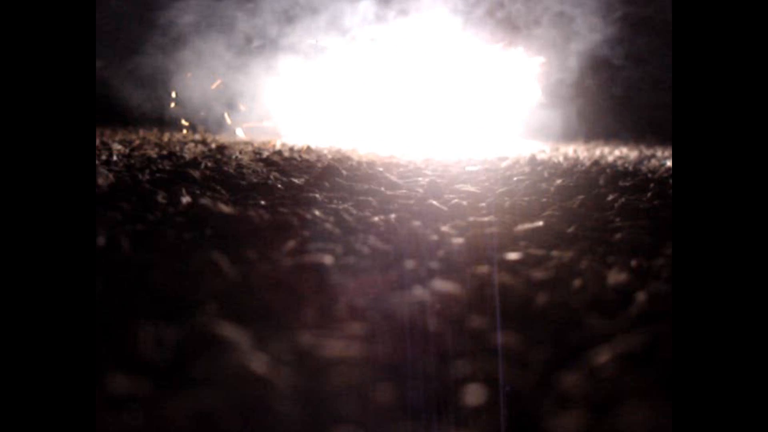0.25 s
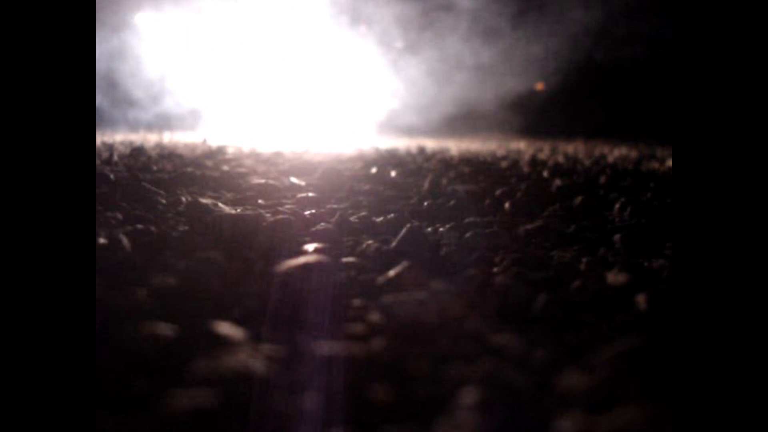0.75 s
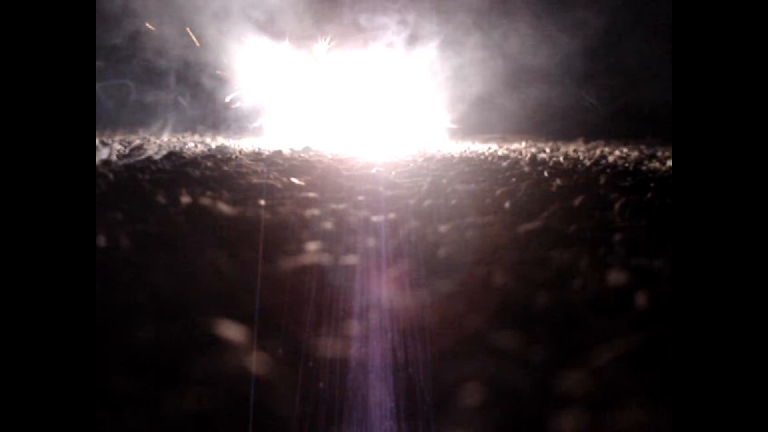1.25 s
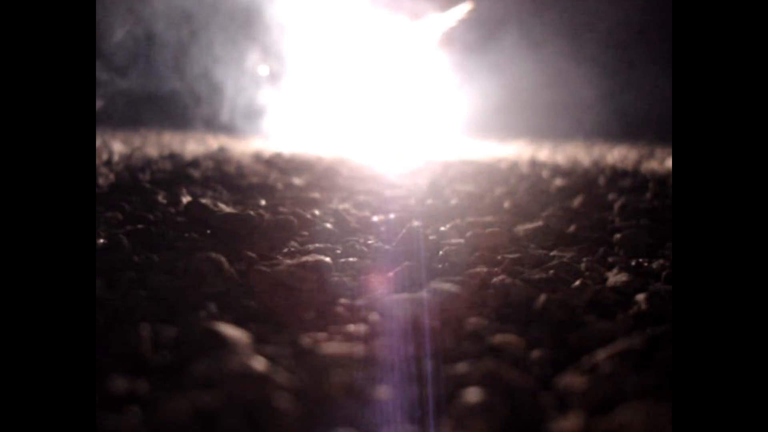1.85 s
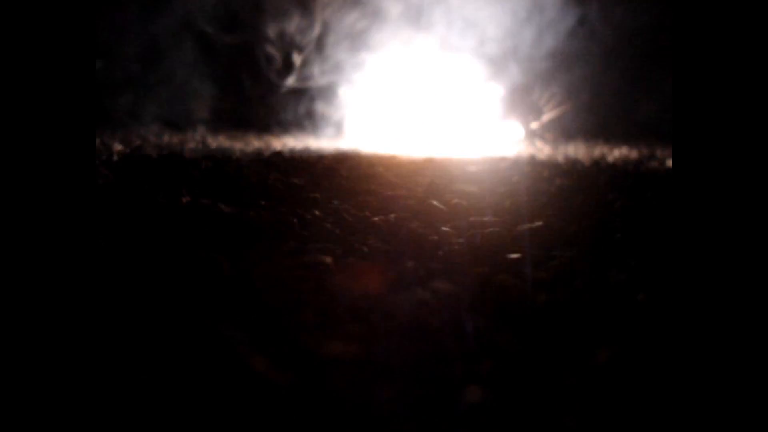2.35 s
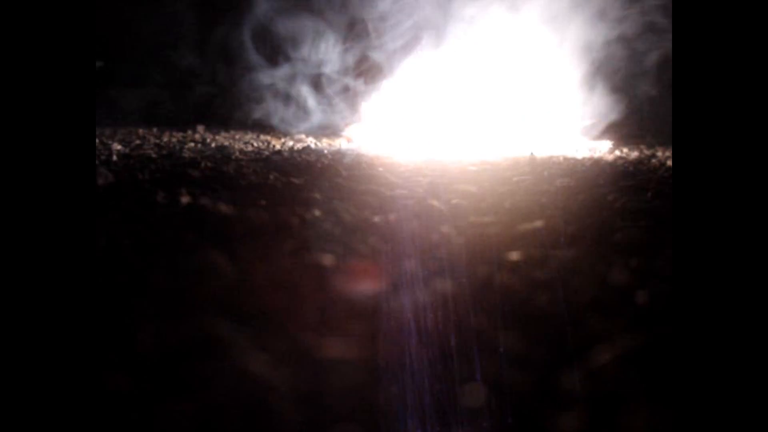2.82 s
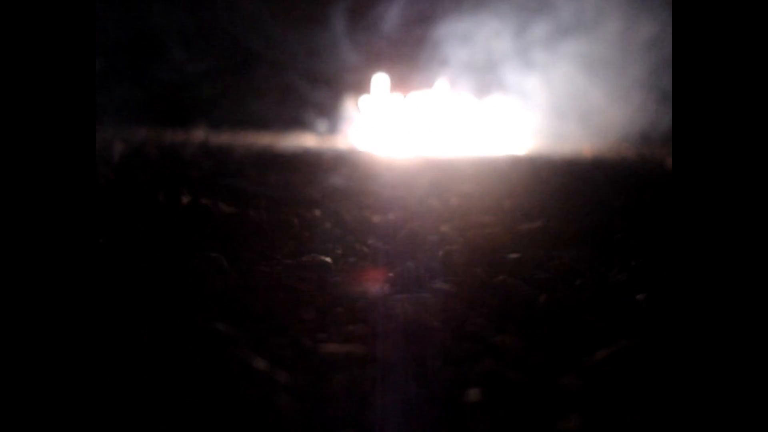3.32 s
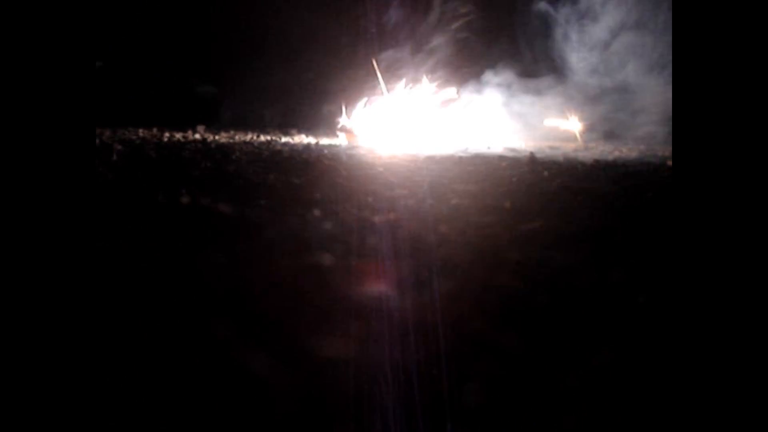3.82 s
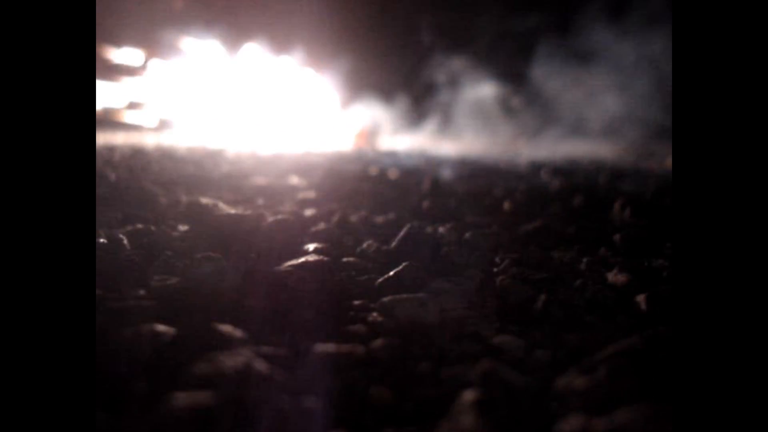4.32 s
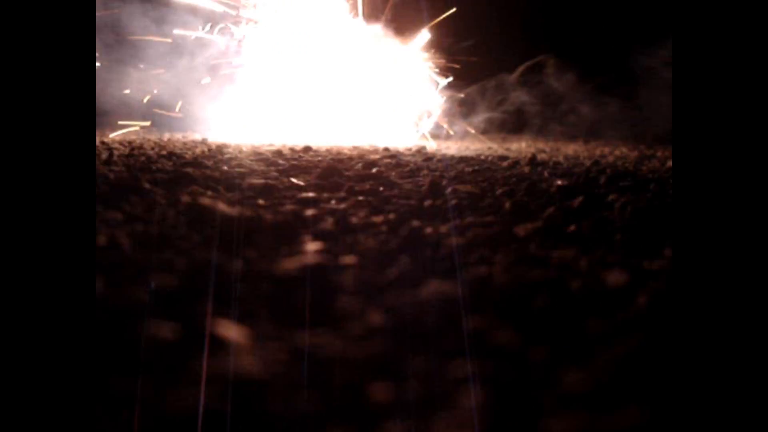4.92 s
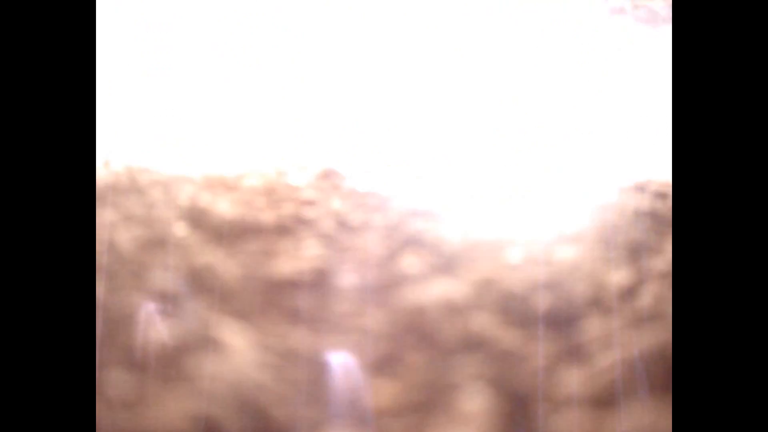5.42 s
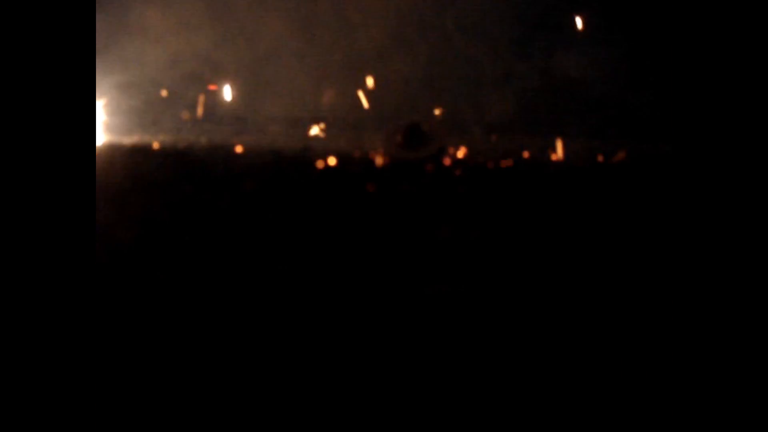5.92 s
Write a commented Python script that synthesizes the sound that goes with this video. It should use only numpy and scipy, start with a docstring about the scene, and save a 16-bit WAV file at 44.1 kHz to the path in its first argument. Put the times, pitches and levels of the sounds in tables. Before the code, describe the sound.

A small firework hisses and sputters close by, chokes, then spits out a quick volley of crackling pops and dies.

```python
"""A small firework burns on rough ground at night, close to the microphone. From the start its jet of gas and
sparks hisses and wanders over a faint hum, now and then with a soft low thump and a brief dip in the hiss. Near
1.8 s one pellet bursts. Near 4.8 s the jet chokes and sputters, then flares once and dies. A volley of
crackling pellets follows over a low rumble of stirred air, and a few last ticks fade at about 6 s."""
import sys
import numpy as np
from scipy import signal
from scipy.fft import rfft, irfft
from scipy.io import wavfile

SR = 44100
rng = np.random.default_rng(int(sys.argv[2]) if len(sys.argv) > 2 else 0)


def to_wav(s):
    """Save 16-bit WAV."""
    ch = np.atleast_2d(s).T  # columns
    pcm = np.round(np.clip(ch, -1, 1) * 32767)  # PCM
    wavfile.write(sys.argv[1], SR, pcm.astype(np.int16))


N = 271638
TIME = np.arange(N) / SR


def from_db(db):
    """Turn decibels into a number to multiply by."""
    return 10 ** (np.asarray(db) / 20)


def rms_one(x):
    """Scale a sound to an average strength (rms) of 1."""
    return x / np.sqrt(np.mean(x ** 2) + 1e-20)


def one_ms(x):
    """Scale a burst to the energy of 1 ms of sound at rms 1."""
    return x / np.sqrt(np.sum(x ** 2) * 1000 / SR + 1e-20)


def at_times(rows, t):
    """Read each column of a table at times t, gliding between rows."""
    seconds, *columns = np.transpose(rows)
    return [np.interp(t, seconds, column) for column in columns]


def at_hz(rows, hz):
    """Read a table of levels at frequencies hz, gliding evenly in pitch."""
    row_hz, db = np.transpose(rows)
    return np.interp(np.log(hz), np.log(row_hz), db)


def band(x, low_hz, high_hz, order=1):
    """Keep mainly the sound between two frequencies."""
    edges = np.clip([low_hz, high_hz], 10, .45 * SR)
    return signal.sosfilt(signal.butter(order, edges, "band", fs=SR, output="sos"), x)


def drift(rate):
    """A smooth random wobble of rms 1 that changes about rate times a second."""
    step = 40   # samples between points of the wobble
    memory = np.exp(-2 * np.pi * rate * step / SR)
    noise = rng.standard_normal(N // step + 2002)
    slow = signal.lfilter([1], [1, -2 * memory, memory ** 2], noise)[2000:]
    return np.interp(np.arange(N) / step, np.arange(len(slow)), rms_one(slow))


def add(out, start, sound):
    """Mix in a short sound, start seconds from the beginning."""
    i = int(np.clip(round(start * SR), 0, N - 1))
    out[i:i + len(sound)] += sound[:N - i]


# The tone of the night air. Each row: frequency in Hz, relative level in dB.
AIR_TONE = [(25, 6), (60, -7), (200, -1), (1000, -5), (5000, -10), (10000, -23.5)]


def night_air(level_db=-71):
    """The open air is a faint, steady noise, strongest in the bass."""
    hz = np.maximum(np.arange(N // 2 + 1) * SR / N, 1)
    spectrum = rfft(rng.standard_normal(N)) * from_db(at_hz(AIR_TONE, hz))
    return from_db(level_db) * rms_one(irfft(spectrum, N))


# How loud the hum is. Each row: time in seconds, level in dB.
HUM_LEVELS = [(0, -58), (2.4, -63.5), (4.6, -57.5), (5.9, -80)]


def hum(pitch_hz=124, spread_hz=9):
    """A narrow band of noise makes a faint hum that wavers under the hiss."""
    noise = band(rng.standard_normal(N), pitch_hz - spread_hz, pitch_hz + spread_hz, order=2)
    return from_db(at_times(HUM_LEVELS, TIME)[0]) * rms_one(noise)


# How loud the stirred air is. Each row: time in seconds, level in dB.
RUMBLE_LEVELS = [(0, -75), (3.9, -71), (4.3, -62), (5.25, -64), (5.48, -53), (5.78, -62), (6.0, -81)]


def air_rumble():
    """Stirred air rumbles on the microphone, most of all during the volley."""
    noise = band(rng.standard_normal(N), low_hz=42, high_hz=72, order=2)
    return from_db(at_times(RUMBLE_LEVELS, TIME)[0]) * rms_one(noise)


# Soft low thumps, most with a brief dip in the hiss. Each row: start in seconds, peak of the thump in dB before
# filtering, # dip of the hiss in dB (below zero, the hiss rises instead).
LOW_THUMPS = [(0.252, -42, -2), (0.267, -43, 0.5), (1.081, -51, -0.5), (1.487, -42, -2), (1.594, -37, 6.5),
              (1.769, -39, 1.5), (2.009, -43, 3.5), (2.127, -46, 3), (3.562, -47, 1), (4.936, -36, 21.5)]


def low_thumps(rise_s=0.0024, fall_s=0.016, recover_s=0.034):
    """Soft low thumps sound, and the hiss dips briefly with each. Returns the thumps and a volume curve for the
    hiss."""
    t = np.arange(SR // 4) / SR
    onset = 1 - np.exp(-t / rise_s)
    push = onset * np.exp(-t / fall_s)
    sag = onset * np.exp(-t / recover_s)
    thumps, dip_db = np.zeros(N), np.zeros(N)
    for start, push_db, depth_db in LOW_THUMPS:
        add(thumps, start, -from_db(push_db) * push / push.max())
        add(dip_db, start, depth_db * sag / sag.max())
    return band(thumps + 1e-18, low_hz=16, high_hz=400), from_db(-dip_db)


def sparks(per_s, spread_db):
    """Sparks snap at random moments, most faint and a few strong."""
    sizes = from_db(spread_db * np.minimum(rng.exponential(1, N), 4))
    snaps = rms_one(sizes * rng.choice([-1, 1], N))
    chance = per_s / SR
    return snaps * (rng.random(N) < chance) / np.sqrt(chance)


# Spells of sputtering. Each row: start in seconds, end in seconds, starting level in dB.
SPUTTER_SPELLS = [(4.76, 5.3, -45), (5.77, 6.15, -64.5)]


def sputter(fade_db_per_s=12):
    """When the jet chokes, and again after the volley, single sparks stand out and fade."""
    level = np.zeros(N)
    for start, end, db in SPUTTER_SPELLS:
        during = (TIME > start) & (TIME < end)
        level[during] += from_db(db - fade_db_per_s * (TIME[during] - start))
    crackle = band(sparks(per_s=240, spread_db=7.5), low_hz=700, high_hz=4000)
    return level * rms_one(crackle)


# The burn slowly swells and sags. Each row: time in seconds, hiss level in dB,
# then low roar and treble, both in dB compared with the hiss.
STEADY_BURN = [(0, -29, -7.5, -1.5), (0.48, -33.5, -7.5, 1.5), (0.58, -27.0, -10.5, 0.5),
               (0.85, -28.5, -12.5, -3.5), (1.25, -30, -10.5, 4.5), (1.5, -29.5, -12.0, -3),
               (1.6, -28.5, -13, -3), (1.9, -28.0, -13, -3), (2.05, -31.5, -9.5, -0.5),
               (2.57, -33.5, -9.5, -4.5), (2.7, -30.5, -10.5, 2.5), (3.45, -28.5, -9.5, -1),
               (3.65, -31.5, -9, 1), (3.8, -26.5, -11, -3.5), (4.15, -28.5, -10.5, -1),
               (4.62, -26.5, -12, -0.5), (4.75, -27, -8.5, 1)]
# The jet chokes, catches again with a dull rush and dies. Each row reads as above.
DYING_BURN = [(4.77, -35, -1, -7), (4.88, -38, -6, -37), (4.945, -24.5, -11, -14), (4.975, -27.5, -10, -3),
              (5.07, -32.5, -4.5, -20), (5.12, -44, -2.5, -7.5), (5.29, -51, -2, -2),
              (5.35, -71.5, 10, -38), (5.62, -58.5, -3, -26), (6.16, -80, -6, 1)]
# Spurts of fresh powder. Each row: time of the peak in seconds, rise and fall in seconds,
# hiss level in dB, treble in dB compared with the hiss.
POWDER_SPURTS = [(0.08, 0.079, 0.06, -32.5, 2), (0.25, 0.045, 0.03, -26.5, 2.5),
                 (0.335, 0.023, 0.099, -27, 1.5), (1.46, 0.05, 0.036, -35.5, 8.5),
                 (1.755, 0.053, 0.024, -32.5, 0.5), (2.73, 0.014, 0.012, -48, 12),
                 (3.217, 0.014, .02, -33, 6), (4.33, 0.021, .04, -41, 9), (4.918, 0.024, 0.011, -28.5, 6),
                 (5.68, 0.0072, 0.0067, -49, 4), (5.781, 0.0057, 0.059, -55, 5)]


def burn(t, spurt_roar_db=-7):
    """Powder burns slowly, with quick spurts on top. Returns hiss, roar and treble in dB at times t."""
    hiss_db, roar_db, treble_db = at_times(list(STEADY_BURN) + list(DYING_BURN), t)
    power = from_db([hiss_db, hiss_db + roar_db, hiss_db + treble_db]) ** 2
    for peak_s, rise_s, fall_s, db, bright_db in POWDER_SPURTS:
        age = t - peak_s
        swell = np.exp(-np.where(age < 0, (age / rise_s) ** 2, age / fall_s))
        peaks = from_db([db, db + spurt_roar_db, db + bright_db])
        power += np.outer(peaks, swell) ** 2
    return 10 * np.log10(power)


def turbulence(spark_db=-4.5, flutter_db=0.65):
    """Rushing gas, peppered with sparks, flutters as the powder burns unevenly."""
    rush = rng.standard_normal(N) + from_db(spark_db) * sparks(per_s=2200, spread_db=4.0)
    return rms_one(rush * from_db(flutter_db * drift(rate=22)))


# The nozzle's bright hiss. Each row: time in seconds, frequency in Hz that it wanders around.
NOZZLE_PITCH = [(0.0, 5580), (1.19, 5520), (1.84, 5160), (3.15, 6600), (3.94, 5670), (4.75, 5560)]


def nozzle(hz, t, brightness_db, width_octaves=0.39, wander_octaves=0.033):
    """The nozzle's boost in dB to one band of hiss; it grows as gas is forced out harder and brighter."""
    wander = wander_octaves * np.interp(t, TIME, drift(rate=3))
    centre_hz = at_times(NOZZLE_PITCH, t)[0] * 2 ** wander
    octaves_away = np.log2(hz[:, None] / centre_hz)
    boost_db = np.maximum(6.0 + 0.082 * brightness_db, 0)
    return boost_db * np.exp(-.5 * (octaves_away / width_octaves) ** 2)


# The basic tone of the jet. Each row: frequency in Hz, relative level in dB.
JET_TONE = [(25, -23.5), (50, -30), (100, -27.5), (170, -8), (240, -7), (600, -5), (1300, -2), (1900, 2),
            (2900, 2.5), (4200, -6), (5000, -5), (8000, -8.5), (10000, -13.5)]


def jet(roar_trim_db=-0.6, treble_trim_db=0.36, flicker_db=0.9):
    """Big swirls of gas roar, small ones hiss, and the treble flickers."""
    # cut the rush into short slices so that each can have its own tone
    slicing = dict(fs=SR, nperseg=512, noverlap=384, nfft=1024)
    hz, t, slices = signal.stft(turbulence(), **slicing)
    hz = np.maximum(hz, 1)
    hiss_db, roar_db, treble_db = burn(t)
    brightness_db = treble_db - hiss_db + flicker_db * np.interp(t, TIME, drift(rate=6.5))
    tone = from_db(at_hz(JET_TONE, hz)[:, None] + nozzle(hz, t, brightness_db))
    # roar, hiss and treble each get their share of the power, blending into one another
    ranges_hz = [(150, 900), (1200, 3800), (4500, 10000)]
    centres_hz = [600, 2200, 5200]
    shares_db = [roar_db - hiss_db + roar_trim_db, 0, brightness_db + treble_trim_db]
    lift_db = np.zeros_like(tone)
    for (low, high), share_db, this_range in zip(ranges_hz, shares_db, np.eye(3)):
        power = np.sum(tone[(hz > low) & (hz < high)] ** 2, axis=0) / len(hz)
        blend = np.interp(np.log(hz), np.log(centres_hz), this_range)
        lift_db += np.outer(blend, share_db - 10 * np.log10(power))
    _, shaped = signal.istft(slices * tone * from_db(lift_db), **slicing)
    return shaped[:N] * from_db(np.interp(TIME, t, hiss_db))


# Bursting pellets. Each row: start in seconds, then the levels of crack, thud and sizzle in dB,
# before the trims below are added.
PELLET_BURSTS = [(1.7673, -12, -27, -33), (4.79, -26, -38, -42), (4.8357, -26, -40, -26),
                 (4.8529, -23, -37, -42), (4.9187, -8, -39, -31), (4.9256, -8, -30, -15),
                 (4.9361, -1.5, -16, -30), (5.1806, -29.5, -46, -29), (5.2174, -14.5, -33, -30.5),
                 (5.2399, -25, -35, -55), (5.3283, -15, -40, -30), (5.332, -9, -34, -19),
                 (5.3344, -12.5, -34, -27), (5.3474, -11.5, -27, -26), (5.3829, -16, -24.5, -20.5),
                 (5.4065, -21, -16, -29), (5.41, -16.5, -20, -44), (5.4438, -33, -21, -19),
                 (5.4527, -23, -19, -19), (5.4558, -29, -31, -22), (5.4613, -28, -40, -25),
                 (5.4672, -8.5, -23, -30), (5.4709, -13, -26, -27), (5.4733, -23, -17, -32),
                 (5.485, -13, -28, -33), (5.5047, -19, -15, -16.5), (5.51, -22, -26, -27),
                 (5.5136, -28, -15.5, -24), (5.5212, -24, -18.5, -22), (5.5281, -16, -12.5, -37),
                 (5.5334, -31, -18, -30), (5.538, -25, -31, -27), (5.5428, -25, -39, -20),
                 (5.5463, -29, -14, -43), (5.557, -21, -17, -35), (5.5679, -19, -13.5, -28),
                 (5.5782, -32, -25, -35), (5.5799, -30, -10.5, -35), (5.5892, -16, -36, -29),
                 (5.6025, -12.5, -40, -26.5), (5.6172, -22, -43, -33), (5.631, -18, -20, -17.5),
                 (5.654, -31, -39, -59), (5.6777, -31.5, -51, -53), (5.7284, -29, -17, -17),
                 (5.738, -27, -43, -17), (5.7452, -16.5, -43, -37), (5.7499, -25, -19, -21),
                 (5.7613, -29.5, -49, -30), (5.925, -46, -54, -45), (6.0097, -28, -42, -58),
                 (6.0267, -39, -60, -62), (6.046, -34, -53, -46), (6.0735, -47, -51, -56),
                 (6.1127, -33.5, -55, -51)]


def pellets(crack_trim_db=-5.6, thud_trim_db=-1.3, sizzle_trim_db=-0.6,
            sizzle_rise_s=0.00052, sizzle_fall_s=0.0021, db_per_octave=28):
    """A pellet bursts: a sharp crack, a knock of its casing, a thud of gas and a sizzle of fragments."""
    t = np.arange(SR // 40) / SR
    shock, out = signal.unit_impulse(len(t)), np.zeros(N)
    knock = from_db(-10) * one_ms(band(shock, 720 / 1.7, 720 * 1.7))
    sizzle_shape = np.exp(-t / sizzle_fall_s) * (1 - np.exp(-t / sizzle_rise_s))
    fragments = rng.standard_normal((len(PELLET_BURSTS), len(t))) * sizzle_shape
    for (start, crack_db, thud_db, sizzle_db), grit in zip(PELLET_BURSTS, fragments):
        # a pellet that shatters into sizzle cracks higher than one that bursts whole
        crack_hz = 2970 * 2 ** ((sizzle_db - max(crack_db, thud_db)) / db_per_octave)
        crack = one_ms(band(shock, crack_hz / 1.53, crack_hz * 1.53)) + knock
        smallness = rng.uniform(.85, 1.2)   # small pellets thud higher
        thud = one_ms(band(shock, 160 * smallness, 490 * smallness))
        sizzle_hz = 1.1 * crack_hz   # a brighter crack throws finer fragments
        sizzle = one_ms(band(grit, sizzle_hz / 2.2, sizzle_hz * 2.2))
        add(out, start, from_db(crack_db + crack_trim_db) * crack)
        add(out, start, from_db(thud_db + thud_trim_db) * thud)
        add(out, start, from_db(sizzle_db + sizzle_trim_db) * sizzle)
    return out


def scene():
    """One microphone near the ground, in the open air, feeds both channels."""
    thumps, hiss_volume = low_thumps()
    sound = jet() * hiss_volume + sputter() + pellets() + thumps + air_rumble() + hum() + night_air()
    return np.array([sound, sound])


def record(dry):
    """Round off the loudest peaks and cut the highest treble."""
    ceiling, cutoff_hz = .48, 10100
    rounded = dry / (1 + (dry / ceiling) ** 4) ** (1 / 4)
    treble_cut = signal.ellip(12, .1, 80, cutoff_hz, fs=SR, output="sos")
    return signal.sosfilt(treble_cut, rounded)


dry = scene()
out = record(dry)
to_wav(out)
```